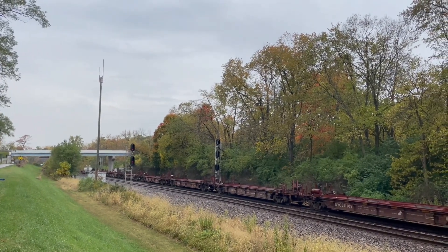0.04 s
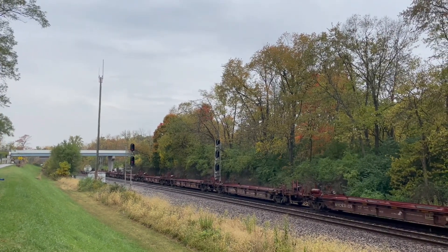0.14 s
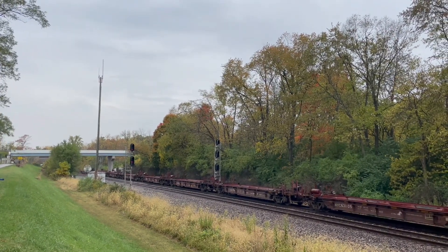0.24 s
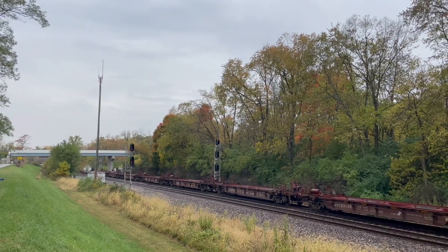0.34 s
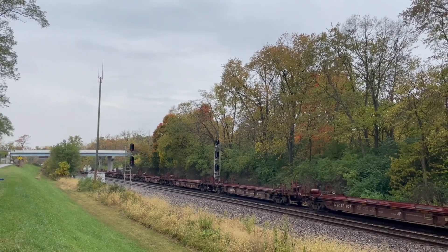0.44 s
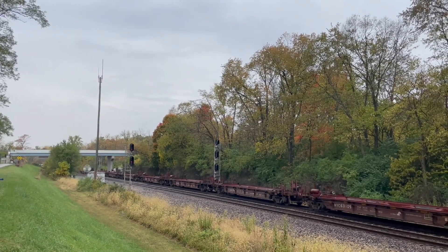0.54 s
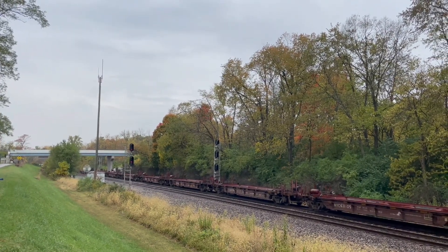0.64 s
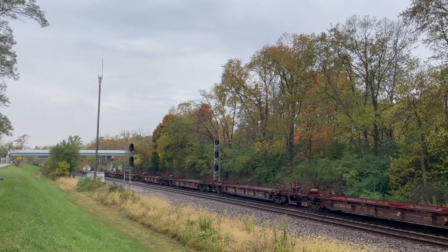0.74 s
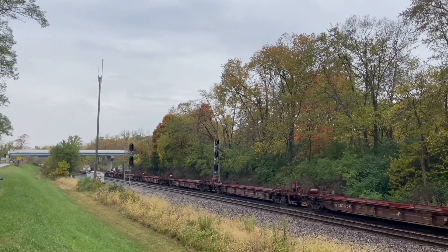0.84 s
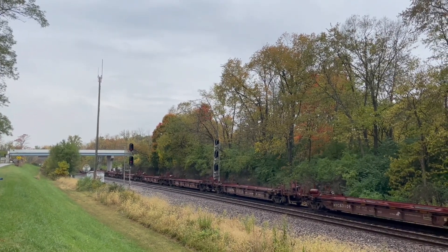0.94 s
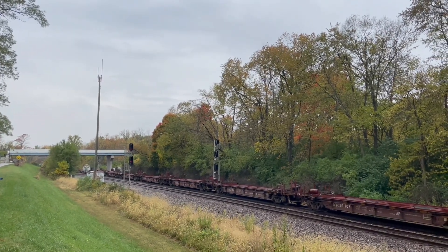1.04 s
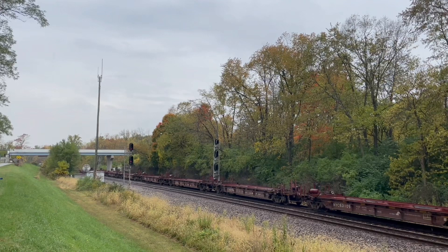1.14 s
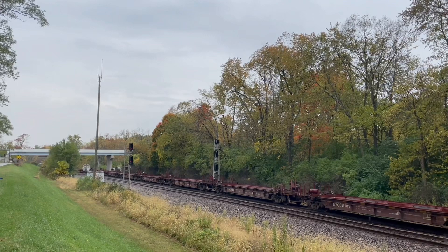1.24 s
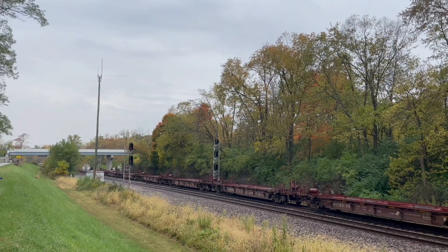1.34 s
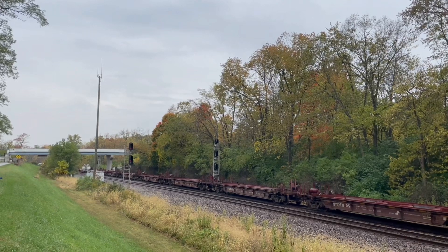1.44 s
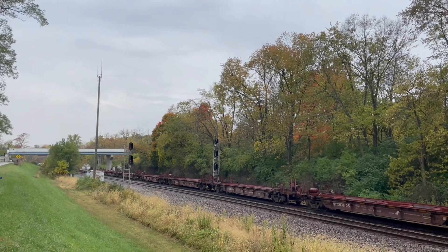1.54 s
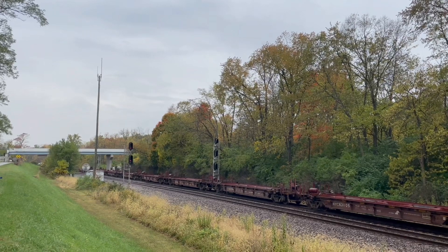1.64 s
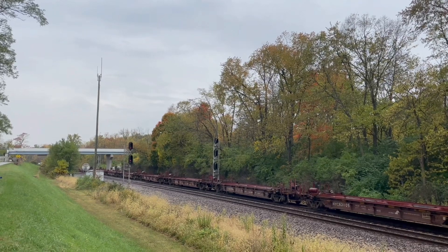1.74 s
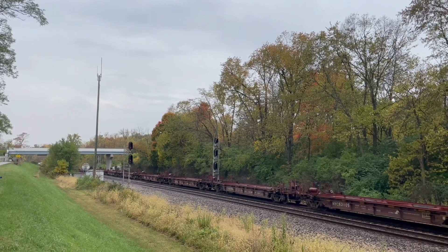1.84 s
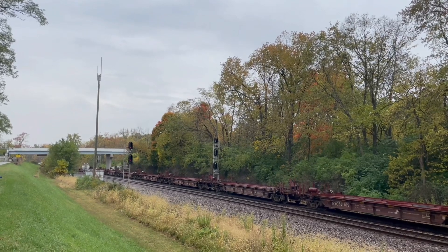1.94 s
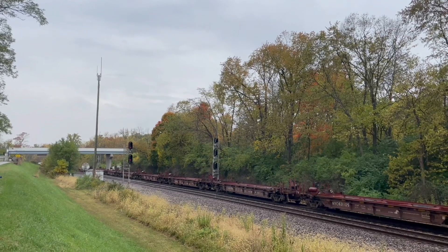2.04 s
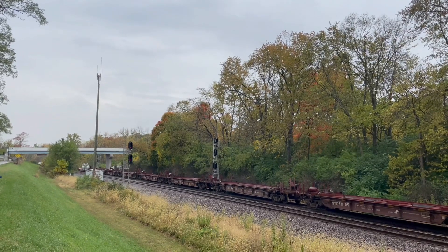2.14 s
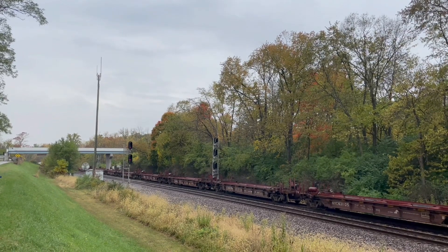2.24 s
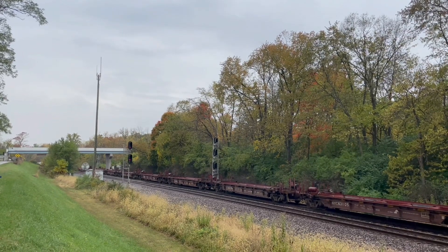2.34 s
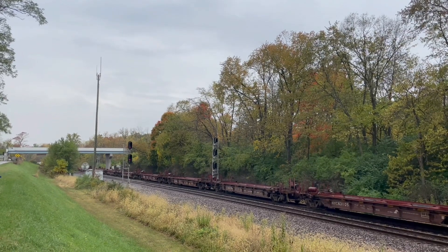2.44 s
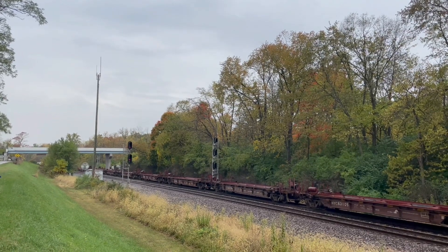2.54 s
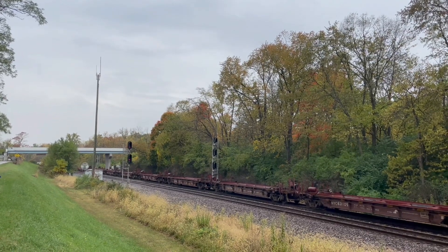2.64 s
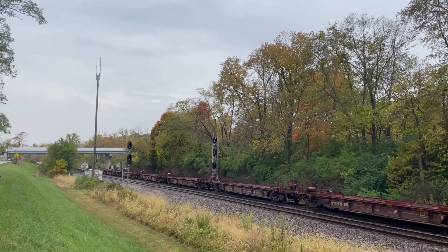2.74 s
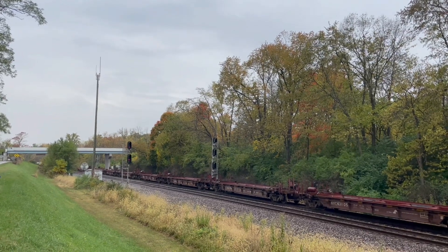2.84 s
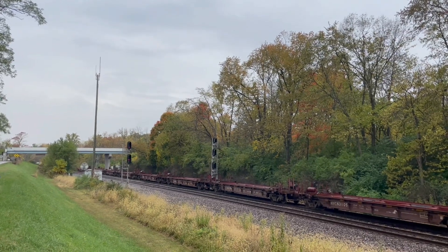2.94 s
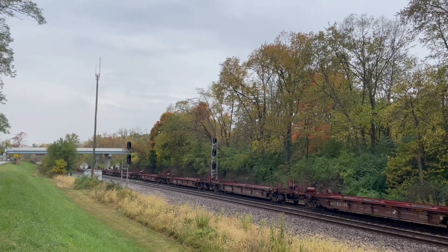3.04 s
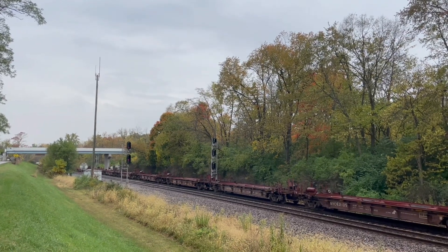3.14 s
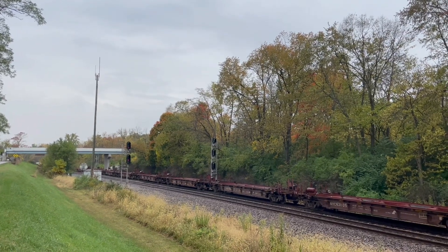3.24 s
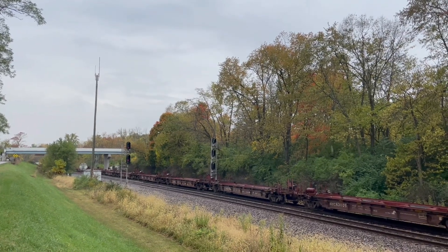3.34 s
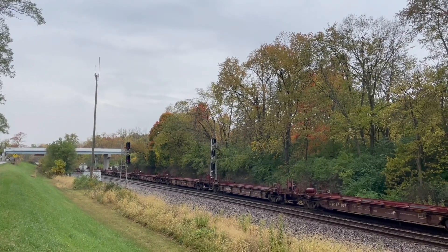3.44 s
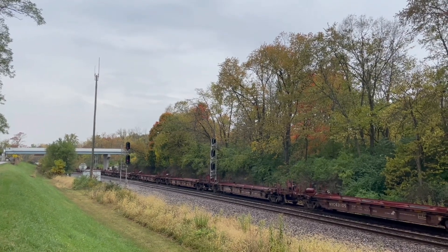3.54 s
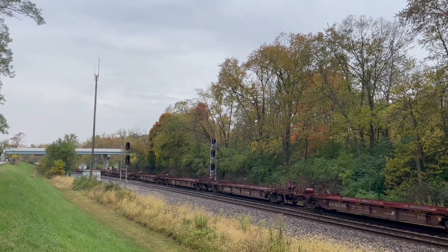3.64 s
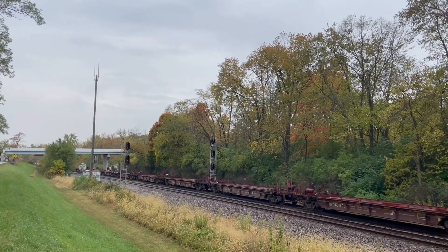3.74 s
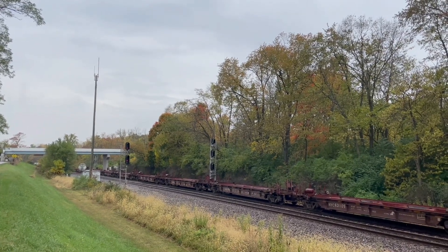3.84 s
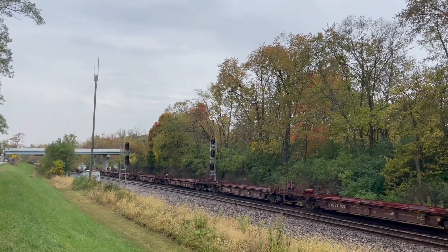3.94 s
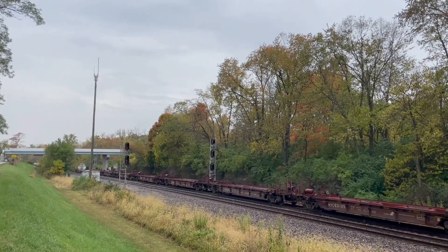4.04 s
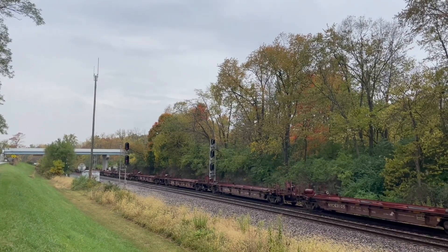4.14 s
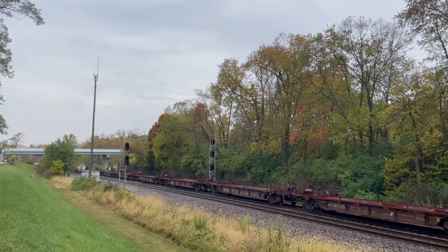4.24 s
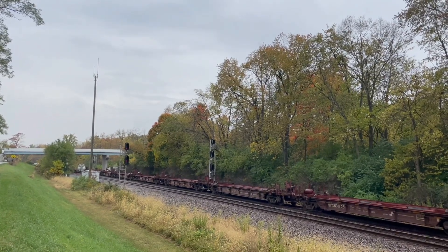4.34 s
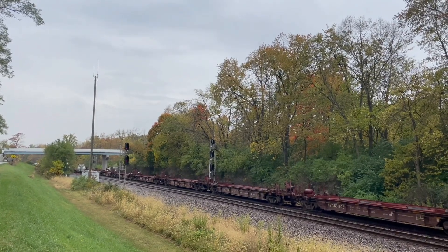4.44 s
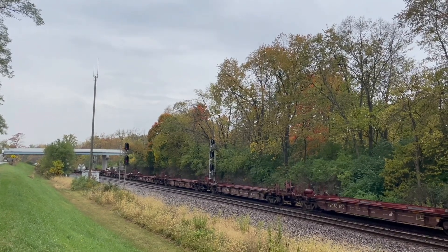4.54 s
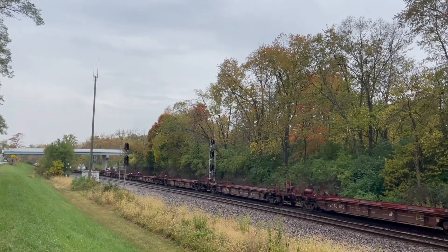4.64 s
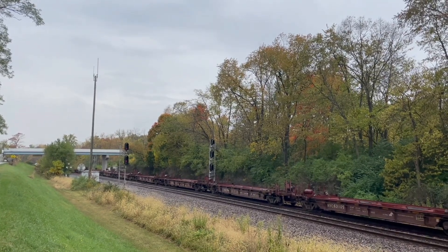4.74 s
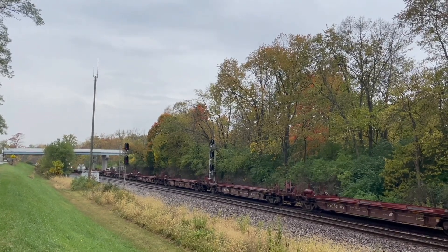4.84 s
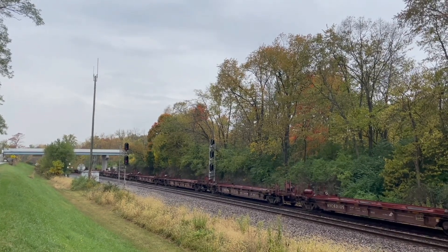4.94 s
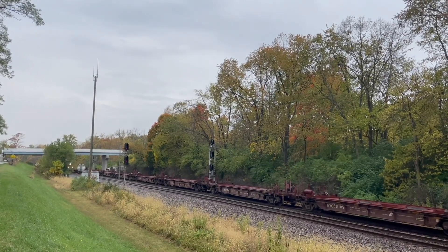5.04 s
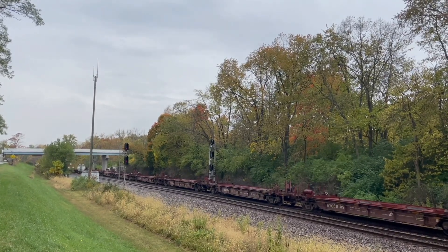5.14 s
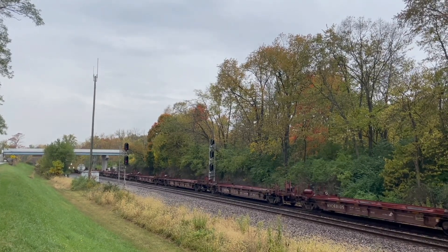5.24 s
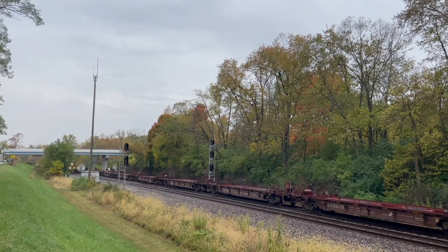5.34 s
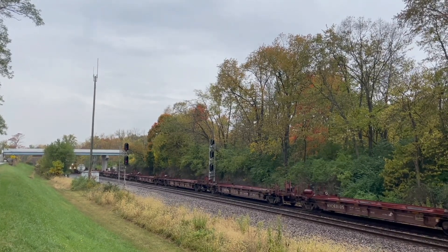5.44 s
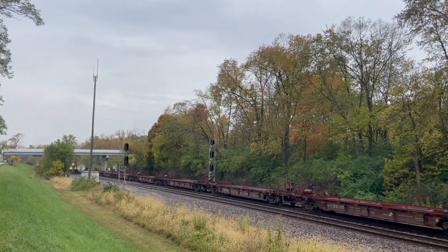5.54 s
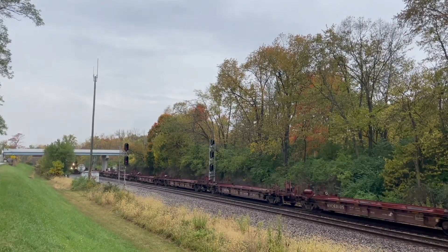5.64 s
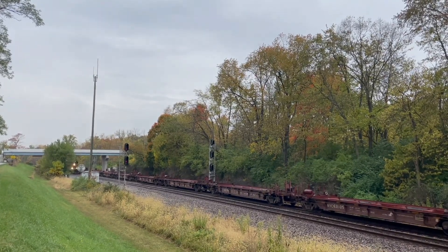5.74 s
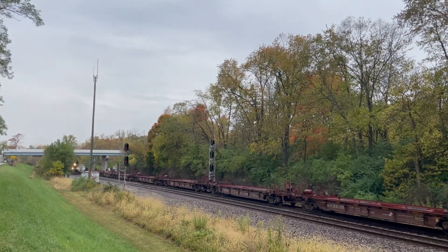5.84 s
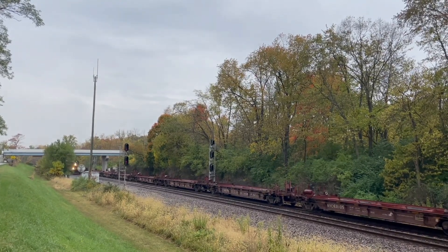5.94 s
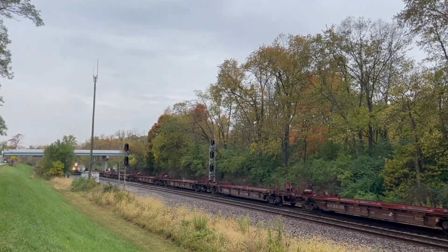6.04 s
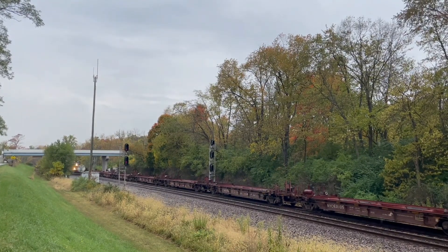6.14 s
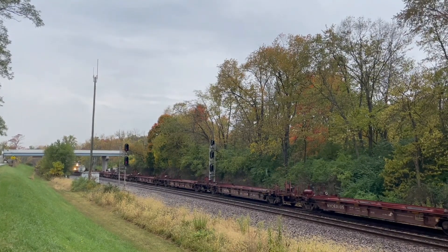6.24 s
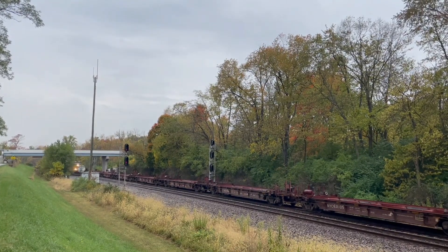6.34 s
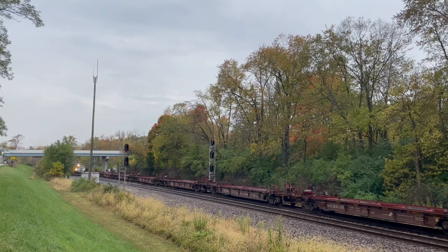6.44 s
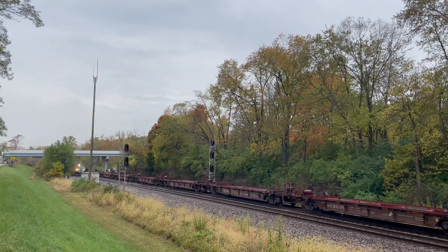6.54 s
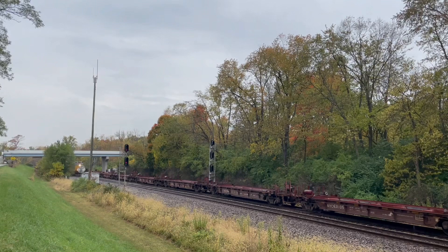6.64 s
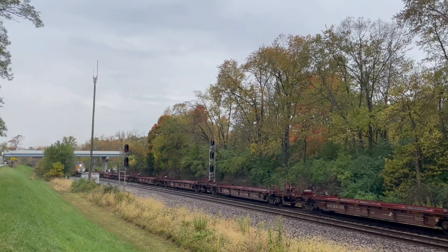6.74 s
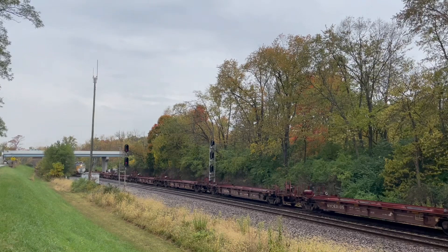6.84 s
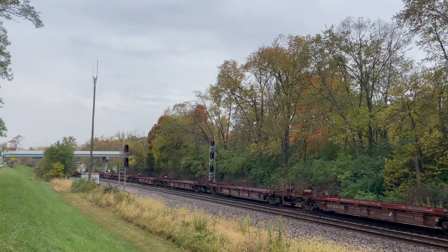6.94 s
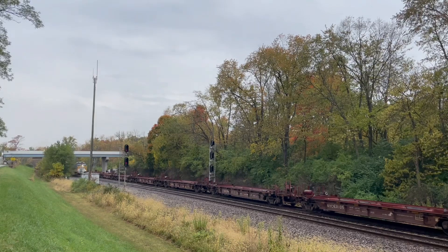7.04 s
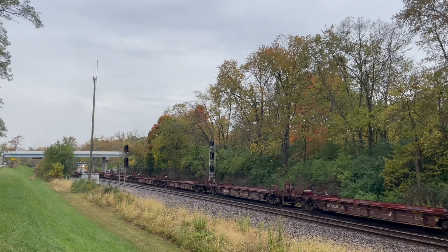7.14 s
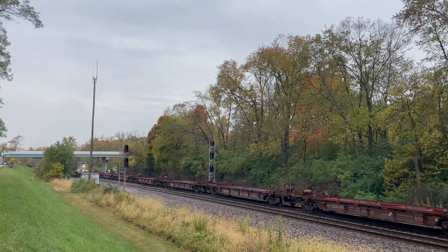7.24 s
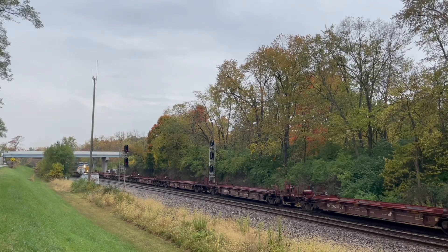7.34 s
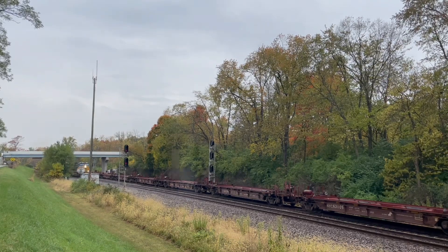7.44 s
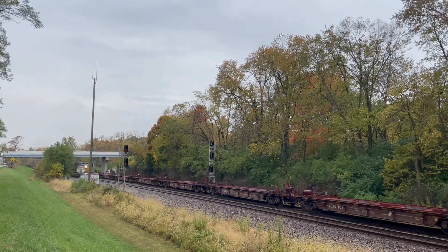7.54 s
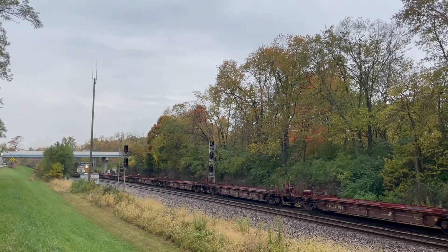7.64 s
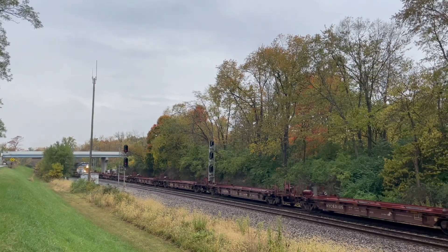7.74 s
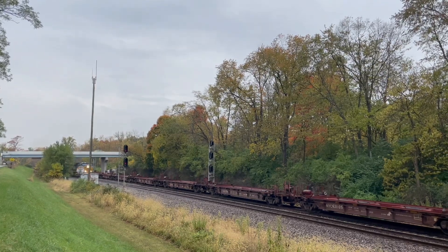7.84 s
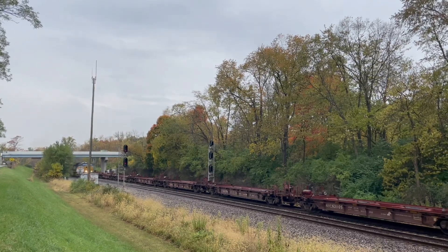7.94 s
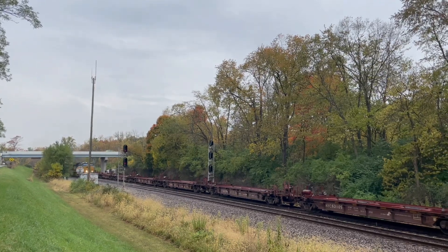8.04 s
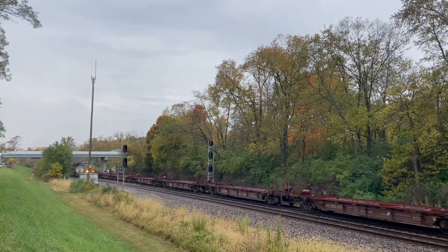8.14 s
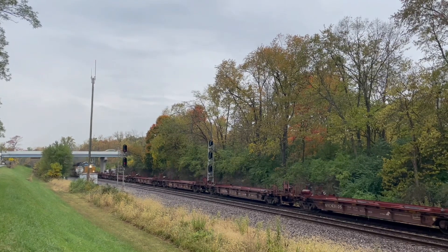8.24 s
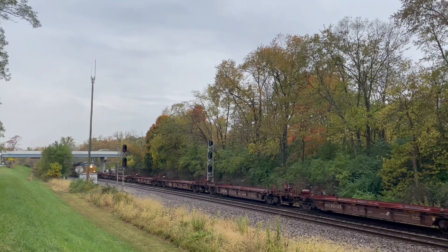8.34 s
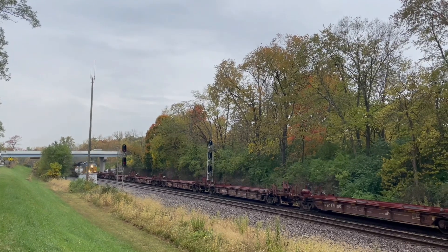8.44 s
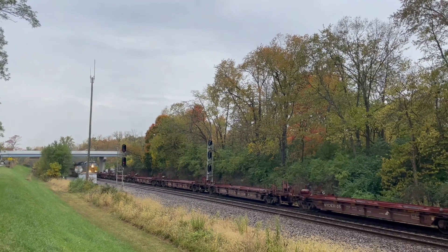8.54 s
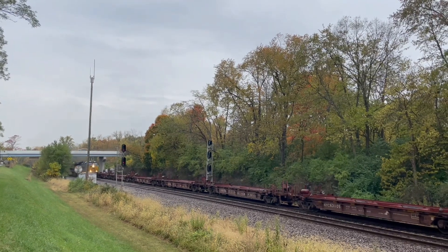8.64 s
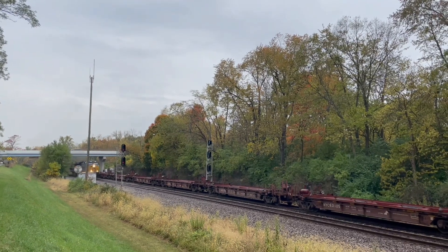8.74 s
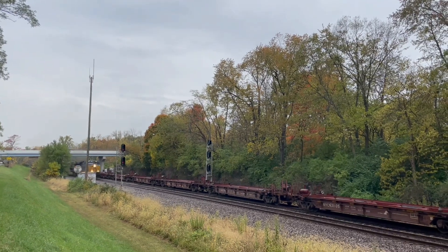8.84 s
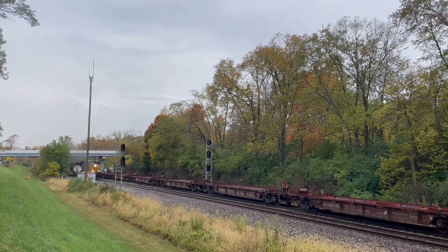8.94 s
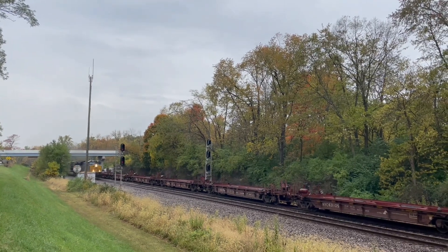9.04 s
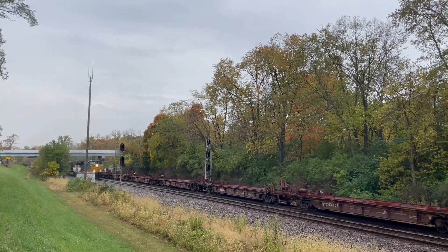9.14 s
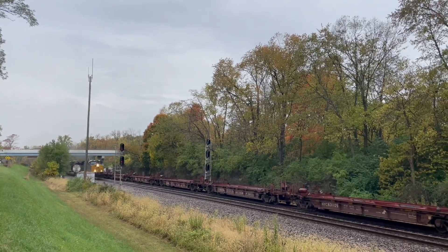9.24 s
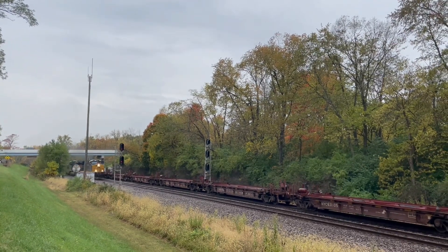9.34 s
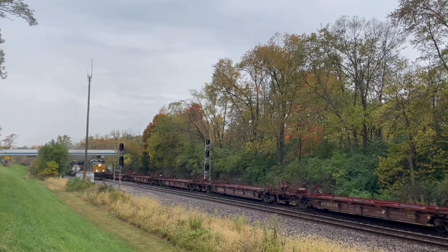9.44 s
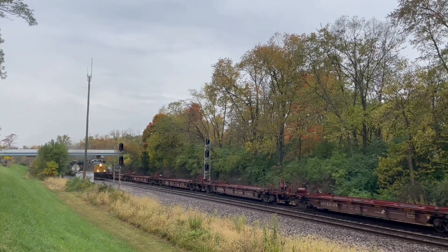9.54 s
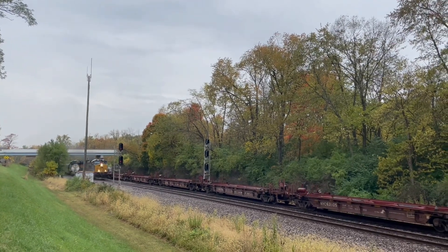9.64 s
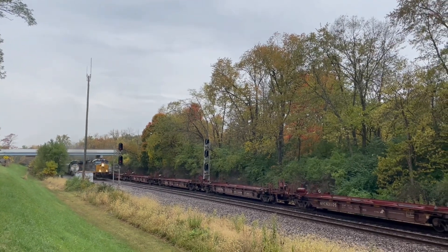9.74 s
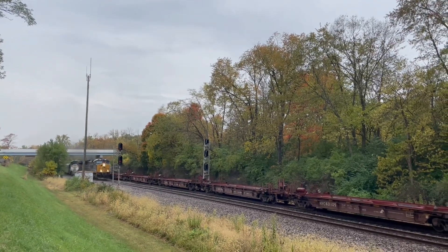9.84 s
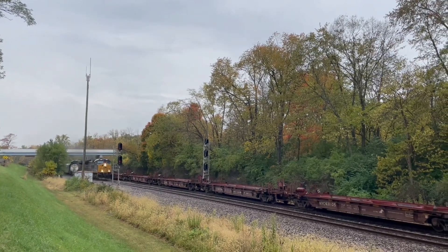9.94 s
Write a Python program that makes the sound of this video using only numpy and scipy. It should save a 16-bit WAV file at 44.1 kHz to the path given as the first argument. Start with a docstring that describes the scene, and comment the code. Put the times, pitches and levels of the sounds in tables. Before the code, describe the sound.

A steady distant locomotive drone wavers over faint rolling noise, with a soft dull knock and light flange rubbing early on. Fluttering gear tones come and go in the midrange. From about six seconds the rumble, rail hiss and whine open up, the exhaust roars and growls, and a low fan tone joins. Loudest near the end, without a pass-by. Open grassy bank with trees opposite, handheld stereo pickup, dry air and little echo.

```python
"""Freight train approaching a grass bank

From beside the track, a diesel freight train draws near from far down the line but does not arrive.
Three four-stroke engines, built from harmonics of their cycles, drone and beat; gear teeth whine upward.
Shaped noise makes the exhaust roar, wheel rumble, rail hiss, flange rub and faint dull knocks.
Wavering tones add ringing wheels and a fan; everything is spread over two microphone channels."""
import sys
import numpy as np
from scipy import signal
from scipy.fft import rfft, irfft, next_fast_len
from scipy.io import wavfile
from scipy.ndimage import uniform_filter1d, map_coordinates

SR = 44100
rng = np.random.default_rng(int(sys.argv[2]) if len(sys.argv) > 2 else 0)


def log_audio(samples):
    """Write samples as a 16-bit WAV file to the path given in sys.argv[1]."""
    # one column per channel
    frames = np.atleast_2d(samples).T
    # limit to full scale, then quantise
    limited = np.clip(frames, -1, 1)
    pcm = np.round(limited * 32767).astype(np.int16)
    wavfile.write(sys.argv[1], SR, pcm)


N = 440559
TIME = np.arange(N) / SR

# Two microphone ports. Each row: frequency in Hz, side minus mid in dB.
STEREO_WIDTH = [(60, -18.5), (350, -15.5), (620, -10.5), (1110, -12), (1500, -10), (2000, 4), (3000, -4.5),
                (4000, 3), (5000, -7.5), (6200, 0), (8000, 9.5), (11500, -13)]
# Sound from the left reaches the two ports out of step.
# Each row: frequency in Hz, share of the side signal a quarter turn ahead of the mid (-1 to 1).
STEREO_SKEW = [(60, 0), (140, .3), (450, -.25), (800, .65), (1700, 0), (2050, .6), (2850, .7), (3500, 0),
               (4200, -.42), (5300, .35), (6450, -.48), (7200, .35), (9200, .7), (10500, 0)]
# Balance of the two channels. Each row: frequency in Hz, left minus right in dB.
STEREO_TILT = [(60, -1.36), (190, -2), (330, 0.5), (620, -2.5), (1100, -1.8), (2000, -2.5), (4000, 1.3),
               (9000, -2)]
TOP_HZ = 12400  # band limit of the recorder

# Noise colours, relative within each table. Each row: frequency in Hz, density in dB per Hz.
RUMBLE_SPECTRUM = [(8, -30), (25, -22), (38, -19.5), (55, -1), (100, -5.5), (150, -6), (260, -27),
                   (600, -79.5)]
WHEEL_SPECTRUM = [(250, -24.5), (480, -4.5), (650, 1.5), (800, 3), (930, -2), (1100, -3.5), (1230, 0),
                  (1380, -11), (1700, -12), (2200, -18.5), (2800, -20.5), (3600, -29.5), (7000, -61)]
FAR_RAIL_SPECTRUM = [(1000, -20), (2200, -3), (3500, 1), (4600, 3), (6300, -2.5), (7300, -13.5),
                     (7900, -30.5), (9500, -18.5), (11000, -24.5), (12500, -42)]
NEAR_RAIL_SPECTRUM = [(1000, -22), (2200, 0), (3500, 0.5), (5000, 1.5), (6500, 1.5), (7300, -8.5),
                      (8000, -19), (9300, -15), (10600, -23.5), (12500, -38)]
FIZZ_SPECTRUM = [(6000, -26), (8000, -1.5), (9500, 2.5), (10800, -0.5), (11800, -14), (12400, -23)]
KNOCK_SPECTRUM = [(200, -19), (450, 3), (900, 4.5), (1400, -21.5), (4000, -52), (9000, -100)]
RUB_SPECTRUM = [(600, -36), (1050, -7), (1300, 2), (1550, 3), (1850, -6.5), (2300, -15.5), (4000, -45)]
ROAR_SPECTRUM = [(70, -37), (130, 4), (185, -2.5), (225, -1.5), (265, -0.5), (310, 1.5), (390, 0),
                 (480, -4), (700, -12.5), (2000, -71)]

ARRIVAL_S = 12.94  # when the front of the train would reach the microphone
# Growth of each noise with distance. Each row: level in dB 1 s before arrival, loss in dB per tenfold
# distance, loss in dB behind the trees, clearing time in seconds, time scale of clearing in seconds,
# level in dB of the steady far wash.
RUMBLE_APPROACH = (-23, 9, 10, 5.3, 0.5, -38)
WHEEL_APPROACH = (-15.5, 24, 1.27, 8, 3, -42.5)
RAIL_APPROACH = (-20, 39.5, 3.5, 7, 0.47, -59.5)
RING_APPROACH = (-44, 18, 3, 6.8, 0.5, -70)
# One surge of rail hiss. The row: peak time in seconds, half length in seconds, rise in dB.
RAIL_HISS_SURGE = (7.13, 0.45, 2.4)
# The wheel roar swells slightly once, late in the approach.
WHEEL_SURGE_S, WHEEL_SURGE_HALF_S, WHEEL_SURGE_DB = 9.25, 0.35, 1

# Faint dull knocks. Each row: start in seconds, level in dB.
KNOCK_TIMES = [(1.079, -30), (5.394, -27), (7.514, -26.5), (9.071, -24.5)]
KNOCK_ATTACK_S, KNOCK_T60_S = 0.003, 0.13
# Flanges rubbing the rail. Each row: start in seconds, length in seconds, level in dB.
FLANGE_RUBS = [(0.84, 1.65, -47.5), (7.092, 1.5, -47.5), (9.593, 0.53, -49)]
RUB_EDGE_S, RUB_REST_DB = 0.2, -55  # time scale of rise and fall; light rubbing in between
# Ringing modes of the steel wheels. Each row: frequency in Hz, relative level in dB.
RING_MODES = [(1610, -2), (1925, 0), (2430, -4), (2860, -5)]
RING_KNOTS_PER_S, RING_FLICKER_DB = 190, 3  # faster wavering widens each mode's band
FAN_HZ, FAN_DB, FAN_AT_S, FAN_OVER_S = 316.66, -33, 9.0, 1.2  # blade tone, near level, fade-in

TOOTH_HZ, TOOTH_RISE_HZ_PER_S = 409.5, 1.0  # gear tooth rate; the train slowly gathers speed
# Driven axles, whose worn wheels differ in speed. Each row: speed ratio, relative level in dB.
FRONT_AXLE_RATIOS = [(1.025, -6), (0.988, -1.5), (0.975, -6)]
REAR_AXLE_RATIOS = [(.927, -3.5), (.945, -1), (.962, -4)]
# Gear harmonics. Each entry: multiple of the tooth rate, relative level in dB far, then near.
MESH_HARMONICS = {1: (-9.5, -7.5), 2: (-1.4, -0.59), 3: (-4, -8), 4: (-16, -22), 7: (-29, -21)}
# Whine of each locomotive. Each row: time it clears the trees in seconds, time scale in seconds,
# screened level in dB at that time, change of that level in dB per second, open level in dB.
FRONT_WHINE_LEVEL = (6, 1, -47, 0.5, -42)
REAR_WHINE_LEVEL = (7, 0.55, -55, -0.83, -38.5)
BEAM_LOSS_DB = 6.5  # the whine carries forward and weakens as the locomotives come close
LOW_MULTIPLE, MIDDLE_MULTIPLE, HIGH_MULTIPLE = 1.003, 1.98, 3.003  # of the tooth rate
# Gear tones that stand out. Each row: time in seconds, level in dB.
LOW_TONE_LEVEL = [(0, -55), (1.1, -48), (1.6, -48), (2, -43.5), (2.2, -47), (2.5, -44), (3.2, -43),
                  (3.9, -49), (4.6, -56), (10, -50.5)]
MIDDLE_TONE_LEVEL = [(0, -51.5), (1, -47), (1.8, -56.5), (2.3, -46.5), (2.6, -57), (3.8, -53), (4.1, -43.5),
                     (5, -48), (5.3, -38.5), (5.6, -48), (5.82, -35), (6.15, -40), (6.5, -40), (8.4, -41),
                     (10, -43.5)]
HIGH_TONE_LEVEL = [(0, -62.5), (2.1, -58), (2.4, -47.5), (3.1, -51), (3.7, -46.5), (5.5, -48), (6, -52),
                   (6.25, -38.5), (6.5, -47.5), (7.1, -46), (7.5, -39.5), (8, -46), (8.5, -40.5),
                   (10, -50.5)]

CYLINDERS = 12
LEAD_CYCLE_HZ, LEAD_SAG_HZ = 9.075, 0.12  # four-stroke cycles per second, and their drop up close
# Each duct delays higher notes more: radians per multiple squared.
LEAD_SMEAR, SECOND_SMEAR, THIRD_SMEAR = 0.403, 1.954, 0.697
LEAD_LAG, SECOND_LAG, THIRD_LAG = 0.778, 0.819, 0.228  # shares of a cycle
# The second engine droops under load and overshoots, the third slows.
# Each row: time in seconds, speed in cycles per second.
SECOND_CYCLE_RATE = [(0, 9.12), (3, 9.13), (4.2, 9.08), (5.5, 9.06), (6.4, 8.92), (7, 8.92), (7.7, 9.13),
                     (8.6, 9.19), (9.5, 9.15), (10, 9.05)]
THIRD_CYCLE_RATE = [(7, 8.7), (7.7, 8.6), (8.1, 8.4), (8.5, 8.6), (9, 8.55), (9.5, 8.48), (10, 8.4)]
# Engine levels; the third is barely there until near. Each row: time in seconds, level in dB.
LEAD_LEVEL = [(0, -32), (2.2, -29), (3.2, -25.5), (4.6, -23.5), (5.4, -26), (6.5, -28), (7.5, -24),
              (8.4, -24), (9.5, -20), (10, -22)]
SECOND_LEVEL = [(0, -29), (2.3, -31), (2.9, -26), (3.5, -30), (3.95, -23), (5.2, -24), (5.9, -29),
                (6.5, -24), (7.2, -28), (8.1, -27), (8.4, -20.5), (9.1, -19.5), (10, -25)]
THIRD_LEVEL = [(0, -46), (6.2, -43), (7, -37), (7.7, -23), (8.1, -27), (8.5, -25), (9, -21.5), (9.5, -23),
               (10, -29)]
# Exhaust roar, and the pitched growl of the lead exhaust. Each row: time in seconds, level in dB.
ROAR_LEVEL = [(0, -41), (1.1, -40), (4.7, -41.5), (5.4, -38.5), (7.3, -32.5), (7.9, -33), (8.8, -30.5),
              (9.45, -29), (9.85, -27.5)]
GROWL_LEVEL = [(0, -51), (1.15, -50), (1.7, -60), (4.7, -62), (5.3, -48), (5.9, -46), (6.3, -40.5),
               (6.7, -42.5), (7, -39.5), (7.3, -37.5), (7.7, -39), (8.05, -47), (8.9, -39), (9.4, -39),
               (9.75, -30.5), (10, -32)]
# Exhaust notes. Each entry: multiple of the cycle rate, relative level in dB far, then near.
LEAD_HARMONICS = {3: (-37, -31), 4: (-39, -33), 5: (-23, -12), 7: (-12, -8), 8: (-7.5, -2.5),
                  10: (-11.5, -9), 11: (0, 0), 13: (-4, -5), 14: (-12.5, -10), 16: (-15, -11),
                  17: (-25, -22), 18: (-31, -28), 20: (-29, -28), 22: (-23, -27), 23: (-26, -30),
                  26: (-28, -28), 28: (-24.5, -29), 40: (-30, -29)}
SECOND_HARMONICS = {6: (-13, -5), 7: (-20, -14), 9: (-2.5, 0), 10: (-17, -13), 12: (0, -5), 15: (-12, -11),
                    18: (-33, -30), 21: (-30, -31)}
THIRD_HARMONICS = {6: (-14, -11), 8: (-7, -14), 9: (-10, 0), 10: (-9, -9), 11: (0, -8), 12: (-12, -7),
                   15: (-17, -13), 18: (-26, -22)}
GROWL_HARMONICS = {20: (-9.5, -14), 22: (-13, -9), 23: (-11, -16.5), 25: (-14, -10.5), 27: (-10.5, -14.5),
                   28: (-11.5, -4), 29: (0, 0), 30: (-14.5, -9.5), 31: (-7.5, -5), 32: (-10.5, -6.5),
                   36: (-11.5, -10.5), 38: (-13, -10.5), 40: (-16.5, -11), 43: (-16.5, -8)}
# The lead engine's strongest note fades for a moment.
DIP_NOTE, DIP_AT_S, DIP_HALF_S, DIP_DB = 11, 5.9, 0.7, 6


def amp(db):
    """Decibels to gain."""
    return 10 ** (np.asarray(db) / 20)


def unit(x):
    """Scale to rms 1 over all channels together."""
    return x / np.sqrt(np.mean(x ** 2) + 1e-20)


def along(points, hz):
    """Read (Hz, value) points on a log frequency axis."""
    f, v = np.transpose(points)
    return np.interp(np.log(hz + 1), np.log(f + 1), v)


def curve(rows):
    """Join (seconds, value) points into one value per sample."""
    s, values = np.transpose(rows)
    return np.interp(TIME, s, values)


def wobble(rate):
    """A smooth random curve with rate knots a second."""
    coarse = np.linspace(0, TIME[-1], num=4000)
    knots = rng.standard_normal(4000)
    smooth = map_coordinates(knots, [coarse * rate], mode="wrap")
    return np.interp(TIME, coarse, smooth)


def filtered(x, response):
    """Multiply the spectrum of x by a response of frequency."""
    m = next_fast_len(N + SR // 4)
    hz = np.fft.rfftfreq(m, 1 / SR)
    return irfft(rfft(x, m) * response(hz), m)[..., :N]


def nearness(at, over):
    """Rise from 0 (far) to 1 (near) around the time at."""
    return .5 + .5 * np.tanh((TIME - at) / over)


def swell(at, half):
    """A smooth rise to 1 at the time at, and back to 0."""
    return np.exp(-((TIME - at) / half) ** 2)


def turning(rate):
    """Running angle of something that turns rate times a second."""
    return 2 * np.pi * np.cumsum(rate) / SR


def spread(pair):
    """Make left and right from a pair: bass from one point, treble partly from all around."""
    def mix(hz):
        share = np.clip(along(STEREO_SKEW, hz), -1, 1)
        parts = np.array([1j * share, np.sqrt(1 - share ** 2)])
        return amp(along(STEREO_WIDTH, hz)) * parts
    mid = pair[0]
    side = filtered(pair, mix).sum(axis=0)
    return np.array([mid + side, mid - side])


def rush(spectrum, patchy_db):
    """Stereo noise with a mid near rms 1, made patchy in time and pitch by the moving air."""
    z = signal.stft(rng.standard_normal((2, N)), nperseg=512)[2]
    patches = uniform_filter1d(rng.standard_normal(z.shape[1:]), size=5, axis=0)  # across frequency
    patches = uniform_filter1d(patches, size=16, axis=1)  # across time
    noise = signal.istft(z * amp(patchy_db * unit(patches)), nperseg=512)[1][:, :N]
    coloured = filtered(noise, lambda hz: amp(along(spectrum, hz)))
    return spread(unit(coloured))


def approach(law):
    """Gain that grows as distance shrinks and the trees stop screening, over a steady far wash."""
    close_db, falloff_db, screen_db, clear_s, over_s, wash_db = law
    distance = np.maximum(ARRIVAL_S - TIME, 1)  # in seconds of travel
    screened = 1 - nearness(clear_s, over_s)
    direct_db = close_db - falloff_db * np.log10(distance) - screen_db * screened
    return np.hypot(amp(direct_db), amp(wash_db))


def knocks():
    """Faint dull knocks: brief soft bumps of low-mid noise that decay fast."""
    gain = np.zeros(N)
    for s, db in KNOCK_TIMES:
        age = np.maximum(TIME - s, 0)
        attack = 1 - np.exp(-age / KNOCK_ATTACK_S)
        gain += amp(db - 60 * age / KNOCK_T60_S) * attack
    return gain * rush(KNOCK_SPECTRUM, patchy_db=1.0)


def fizz():
    """The air absorbs the highest rail noise until the wheels are close, late in the approach."""
    return amp(-58.5) * nearness(at=9.4, over=.5) * rush(FIZZ_SPECTRUM, patchy_db=1.0)


def flanges():
    """Wheel flanges lean on the rail for a second or so and let go: mid-pitched, fluttering noise."""
    press = np.zeros(N)
    for s, length, db in FLANGE_RUBS:
        press += amp(db) * (nearness(s, RUB_EDGE_S) - nearness(s + length, RUB_EDGE_S))
    gain = np.hypot(press, amp(RUB_REST_DB))
    return gain * amp(0.77 * wobble(16)) * rush(RUB_SPECTRUM, patchy_db=-0.5)


def ringing():
    """Rough rail keeps the steel wheels ringing faintly; each mode is a narrow, flickering band."""
    out = np.zeros((2, N))
    for hz, db in RING_MODES:
        phase = 2 * np.pi * hz * TIME
        band = np.zeros((2, N))
        for channel in band:
            channel += wobble(RING_KNOTS_PER_S) * np.sin(phase)
            channel += wobble(RING_KNOTS_PER_S) * np.cos(phase)
        flicker = amp(RING_FLICKER_DB * wobble(14))
        out += amp(db) * unit(flicker * band)
    return approach(RING_APPROACH) * spread(out)


def ground_rumble():
    """Low noise from the ground under the train grows as the distance shrinks."""
    return approach(RUMBLE_APPROACH) * rush(RUMBLE_SPECTRUM, patchy_db=-1.5)


def rolling_wheels():
    """The rolling wheels roar in mid-range noise that flutters and swells slightly once."""
    surge_db = WHEEL_SURGE_DB * swell(WHEEL_SURGE_S, WHEEL_SURGE_HALF_S)
    flutter_db = 0.27 * wobble(9) + 0.65 * wobble(26)
    gain = approach(WHEEL_APPROACH) * amp(flutter_db + surge_db)
    return gain * rush(WHEEL_SPECTRUM, patchy_db=1.0331)


def hissing_rails():
    """The rails hiss in treble noise that crossfades from a far to a brighter near colour."""
    near = nearness(at=6.7, over=1.9)
    far_hiss = np.sqrt(1 - near) * rush(FAR_RAIL_SPECTRUM, patchy_db=1.5)
    near_hiss = np.sqrt(near) * rush(NEAR_RAIL_SPECTRUM, patchy_db=1.32)
    at, half, surge_db = RAIL_HISS_SURGE
    flutter = amp(surge_db * swell(at, half) + 0.34 * wobble(24))
    return approach(RAIL_APPROACH) * flutter * (far_hiss + near_hiss)


def fan():
    """A radiator fan's wavering blade tone comes through as the locomotives near."""
    phase = 2 * np.pi * FAN_HZ * TIME + 0.6 * wobble(6)
    gain = amp(FAN_DB + 1.5 * wobble(9.6)) * nearness(FAN_AT_S, FAN_OVER_S)
    return gain * np.sqrt(2) * np.sin(phase)


def tooth_angle():
    """Running angle of the gear tooth rate, which rises steadily."""
    return turning(TOOTH_HZ + TOOTH_RISE_HZ_PER_S * TIME)


def gear_tone(rows, multiple, scatter, fade_db):
    """One thin, fluttering gear tone that comes straight down the track."""
    phase = multiple * tooth_angle() + scatter * wobble(16)
    flutter = amp(fade_db * wobble(22))
    tone = flutter * np.sin([phase, phase + 2 * wobble(22)])
    return amp(curve(rows)) * unit(tone)


def singing():
    """Three gear tones stand out of the blurred whine, each swelling and fading on its own."""
    low = gear_tone(LOW_TONE_LEVEL, LOW_MULTIPLE, scatter=0.3, fade_db=3.0)
    middle = gear_tone(MIDDLE_TONE_LEVEL, MIDDLE_MULTIPLE, scatter=0.75, fade_db=3.8)
    high = gear_tone(HIGH_TONE_LEVEL, HIGH_MULTIPLE, scatter=1.7, fade_db=4.0)
    return spread(low + middle + high)


def whine_gain(law):
    """A locomotive's whine steps forward when it clears the trees, then weakens up close."""
    clear_s, over_s, screened_db, db_per_s, open_db = law
    clear = nearness(clear_s, over_s)
    far_db = screened_db + db_per_s * (TIME - clear_s)
    beam_loss_db = BEAM_LOSS_DB * nearness(at=9.6, over=.3)
    return amp(far_db + (open_db - far_db) * clear - beam_loss_db)


def mesh(axles, scatter, fade_db):
    """Each driven axle sings at its tooth rate; many paths through the trees blur and fade the lines."""
    angle = tooth_angle()
    near = nearness(at=4.5, over=0.82)
    out = np.zeros((2, N))
    for ratio, axle_db in axles:
        for k, (far_db, near_db) in MESH_HARMONICS.items():
            line_db = axle_db + far_db + (near_db - far_db) * near
            gain = amp(line_db + fade_db * wobble(13))
            phase = k * (ratio * angle + scatter * wobble(13))
            out += gain * np.sin([phase, phase + 3 * wobble(12)])
    return out


def gears():
    """The traction gears of two locomotives whine, the rear pitched a little lower."""
    front = whine_gain(FRONT_WHINE_LEVEL) * mesh(FRONT_AXLE_RATIOS, scatter=0.757, fade_db=3.5)
    rear = whine_gain(REAR_WHINE_LEVEL) * mesh(REAR_AXLE_RATIOS, scatter=0.711, fade_db=4.5)
    return spread(front + rear)


def engine(angle, level_db, note, near, smear, fade_db, drift):
    """Unequal cylinders repeat once a cycle: a comb of lines, smeared by the duct, high notes wavering most."""
    out = np.zeros(N)
    for k, (far_db, near_db) in note.items():
        phase = k * angle - smear * k ** 2 + drift * k ** 2 * wobble(5)
        fading_db = fade_db * k / CYLINDERS * wobble(5)
        out += amp(far_db + (near_db - far_db) * near + fading_db) * np.cos(phase)
    return np.sqrt(2) * amp(level_db) * out


def lead_cycle():
    """The lead engine holds its speed; its pitch sags a little as it comes close."""
    rate = LEAD_CYCLE_HZ - LEAD_SAG_HZ * nearness(at=8.7, over=0.367)
    return turning(rate) - 2 * np.pi * LEAD_LAG


def exhaust():
    """The exhaust roars in puffs with the lead engine, whose upper harmonics surge into a pitched growl."""
    cycle = lead_cycle()
    puffs = 1 + 0.45 * np.sin(CYLINDERS * cycle) + 0.2 * np.sin(cycle)
    roar = amp(curve(ROAR_LEVEL)) * puffs * rush(ROAR_SPECTRUM, patchy_db=1.0)
    near = nearness(at=8.1, over=0.42)
    growl = engine(cycle, curve(GROWL_LEVEL), GROWL_HARMONICS, near, LEAD_SMEAR,
                   fade_db=1.3, drift=0.0011)
    return roar + growl


def drone():
    """The three engines run at nearly the same speed, so their harmonics beat slowly."""
    dip_db = DIP_DB * swell(DIP_AT_S, DIP_HALF_S)
    dipped = [db - dip_db for db in LEAD_HARMONICS[DIP_NOTE]]
    lead_note = {**LEAD_HARMONICS, DIP_NOTE: dipped}
    second_cycle = turning(curve(SECOND_CYCLE_RATE)) - 2 * np.pi * SECOND_LAG
    third_cycle = turning(curve(THIRD_CYCLE_RATE)) - 2 * np.pi * THIRD_LAG
    lead = engine(lead_cycle(), curve(LEAD_LEVEL), lead_note,
                  nearness(at=5, over=0.4), LEAD_SMEAR, fade_db=1.0, drift=0.0009)
    second = engine(second_cycle, curve(SECOND_LEVEL), SECOND_HARMONICS,
                    nearness(at=6, over=0.4), SECOND_SMEAR, fade_db=1.5, drift=0.001)
    third = engine(third_cycle, curve(THIRD_LEVEL), THIRD_HARMONICS,
                   nearness(at=8.3, over=0.2), THIRD_SMEAR, fade_db=1.6, drift=0.002)
    return lead + second + third


def scene():
    """The whole train; the trees on the right throw a little more sound back in most bands."""
    details = knocks() + fizz() + flanges() + ringing()
    rolling = ground_rumble() + rolling_wheels() + hissing_rails()
    machinery = fan() + singing() + gears()
    train = details + rolling + machinery + exhaust() + drone()
    return filtered(train, lambda hz: amp(np.outer([.5, -.5], along(STEREO_TILT, hz))))


def record(dry):
    """The recorder keeps nothing above its band limit."""
    return filtered(dry, lambda hz: hz < TOP_HZ)


dry = scene()
out = record(dry)
log_audio(out)
```